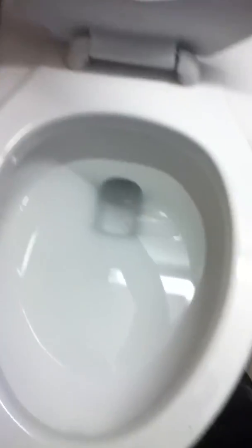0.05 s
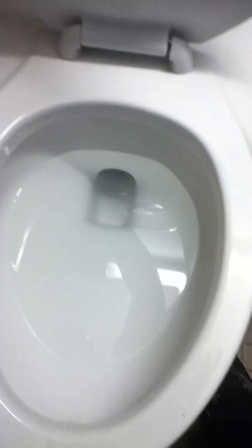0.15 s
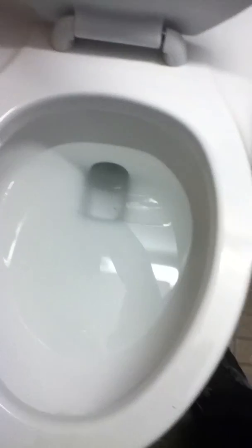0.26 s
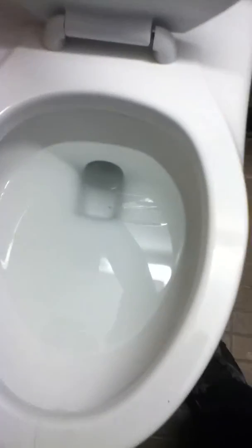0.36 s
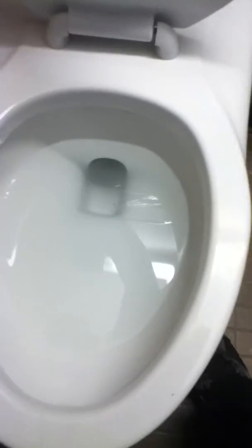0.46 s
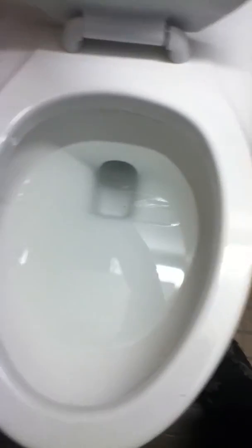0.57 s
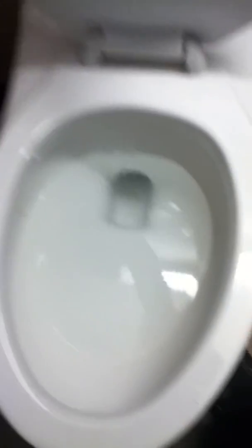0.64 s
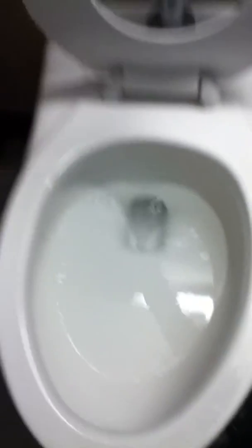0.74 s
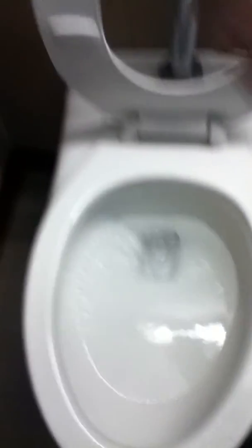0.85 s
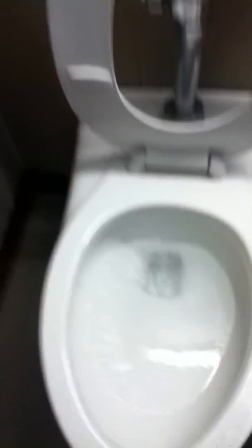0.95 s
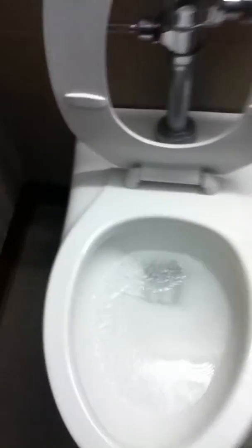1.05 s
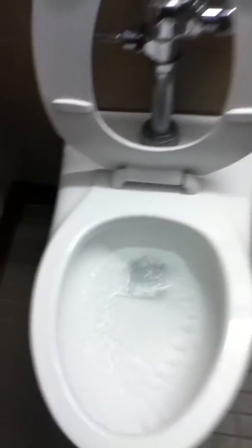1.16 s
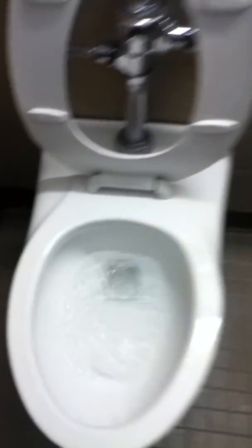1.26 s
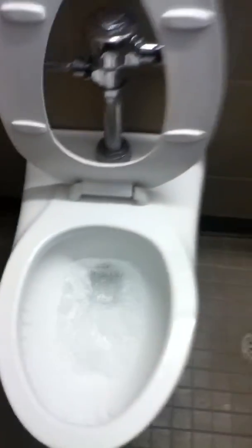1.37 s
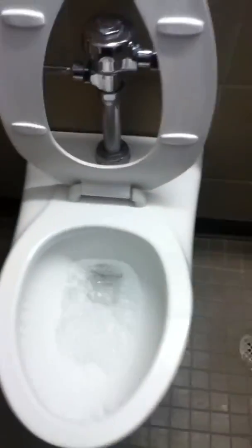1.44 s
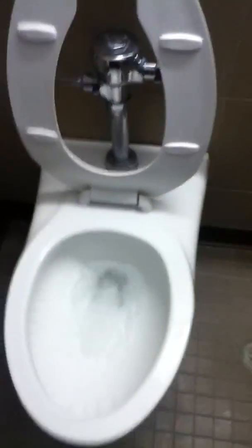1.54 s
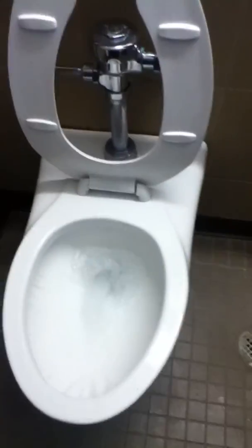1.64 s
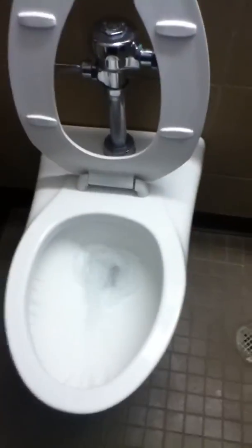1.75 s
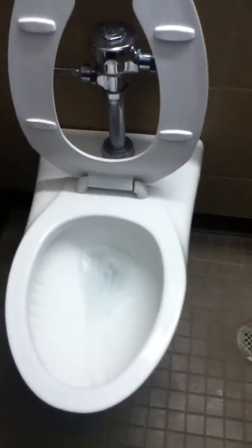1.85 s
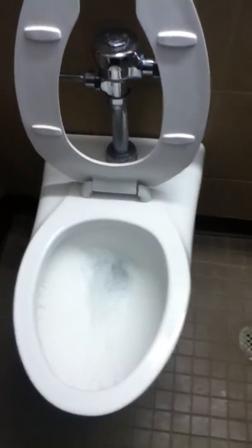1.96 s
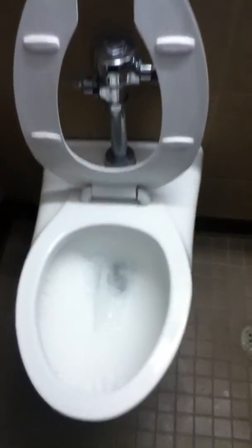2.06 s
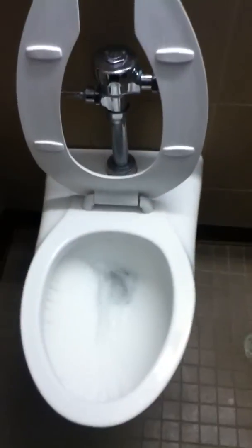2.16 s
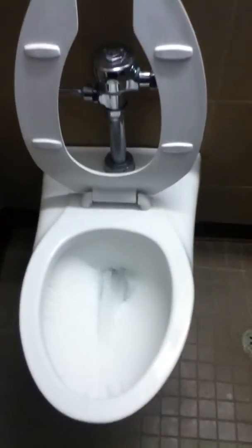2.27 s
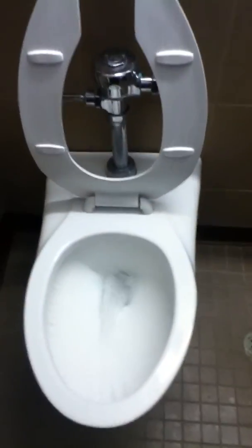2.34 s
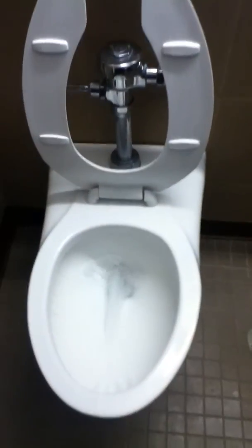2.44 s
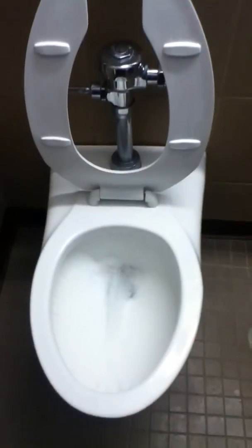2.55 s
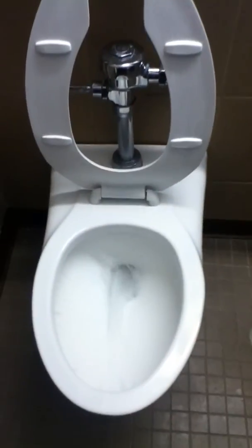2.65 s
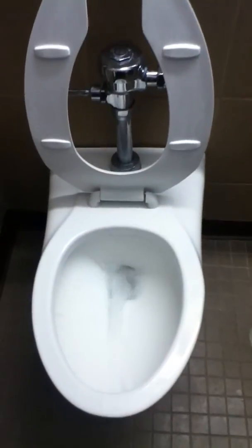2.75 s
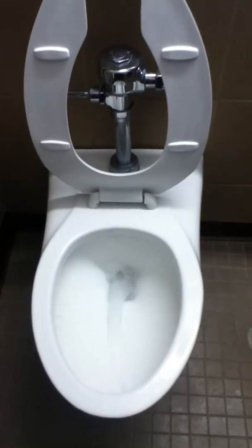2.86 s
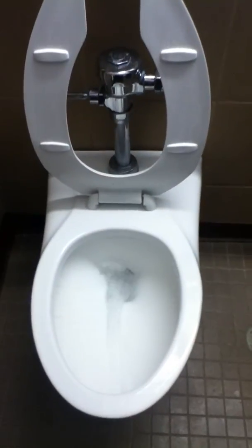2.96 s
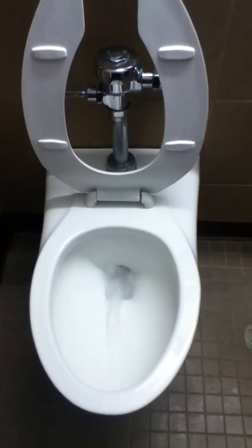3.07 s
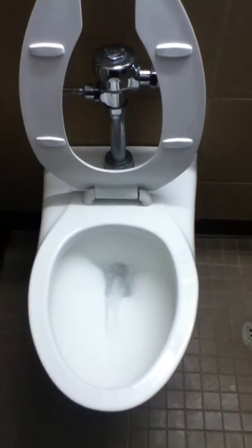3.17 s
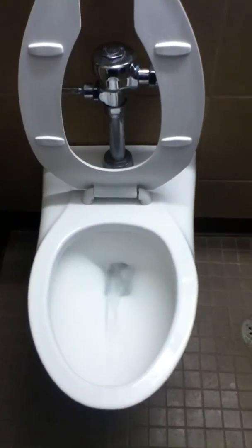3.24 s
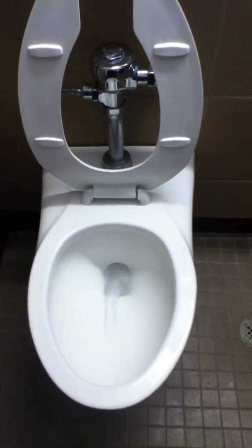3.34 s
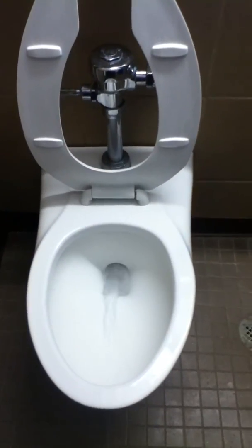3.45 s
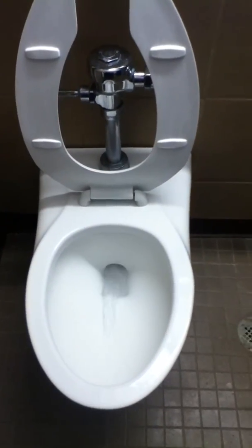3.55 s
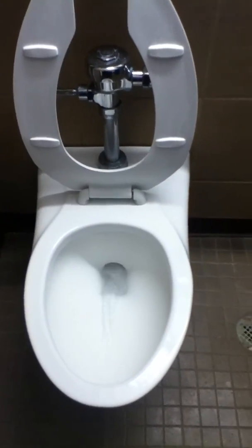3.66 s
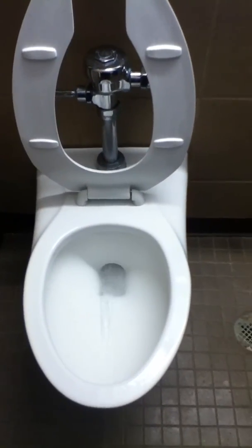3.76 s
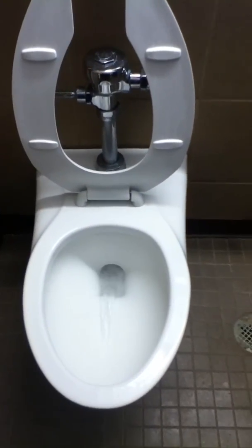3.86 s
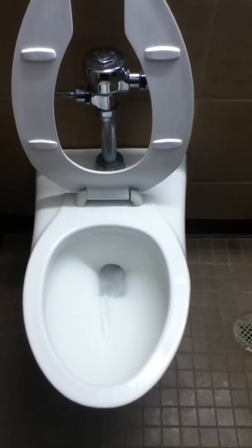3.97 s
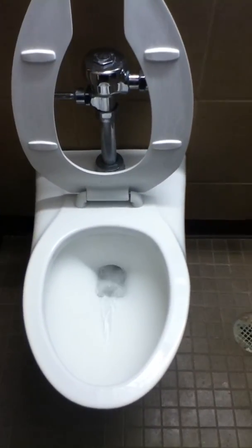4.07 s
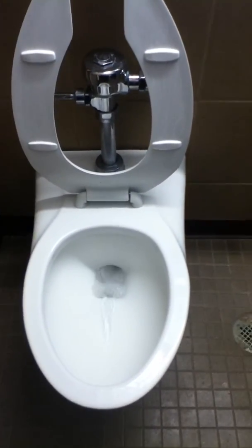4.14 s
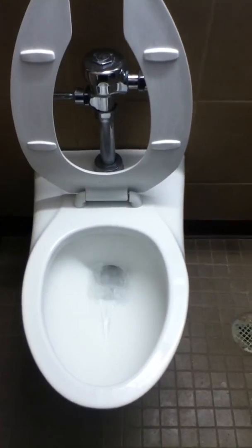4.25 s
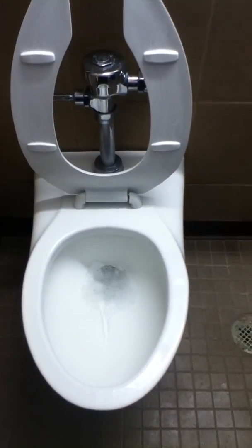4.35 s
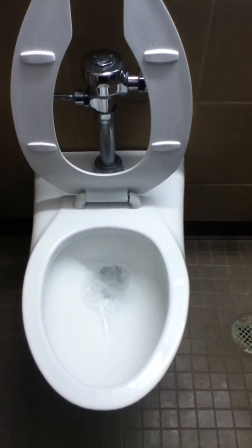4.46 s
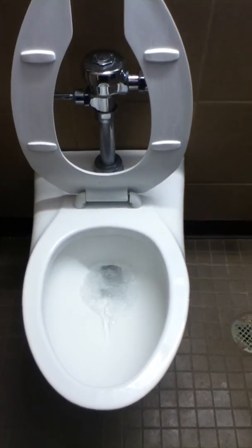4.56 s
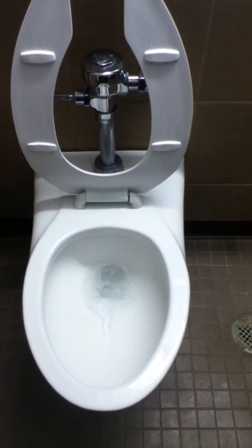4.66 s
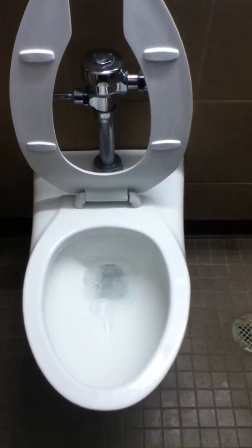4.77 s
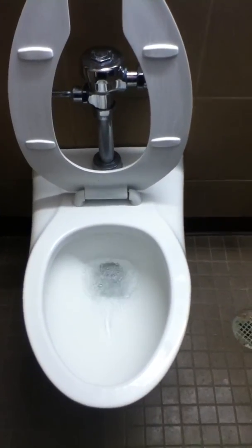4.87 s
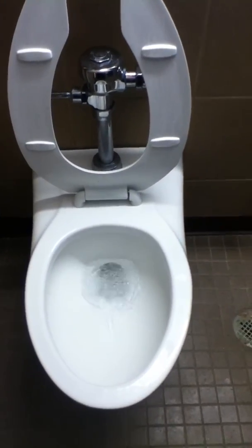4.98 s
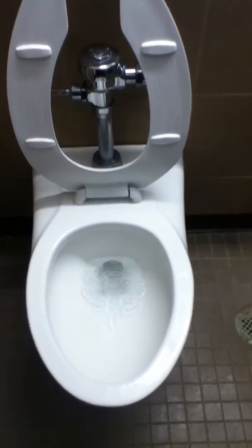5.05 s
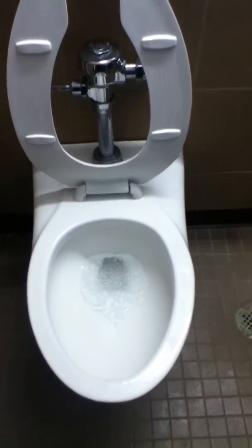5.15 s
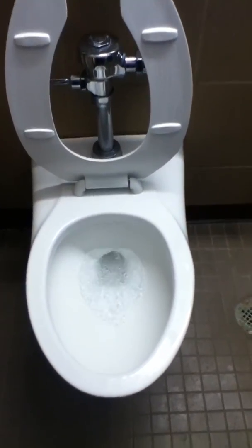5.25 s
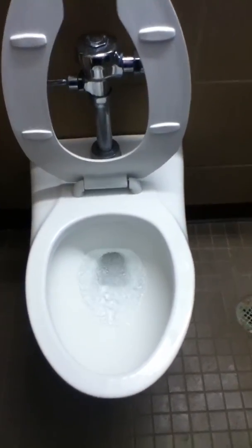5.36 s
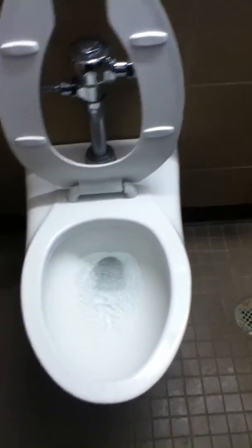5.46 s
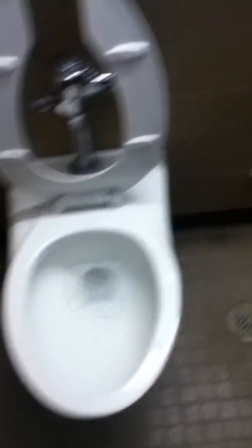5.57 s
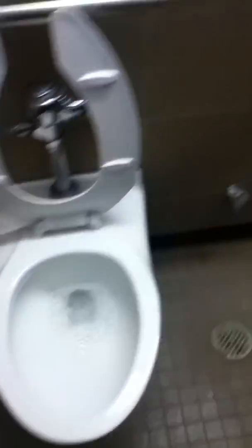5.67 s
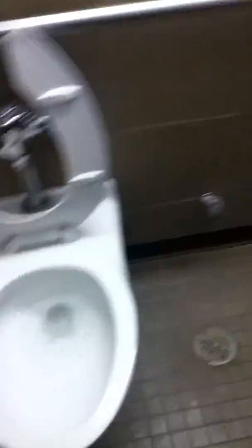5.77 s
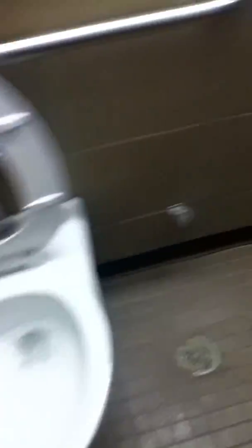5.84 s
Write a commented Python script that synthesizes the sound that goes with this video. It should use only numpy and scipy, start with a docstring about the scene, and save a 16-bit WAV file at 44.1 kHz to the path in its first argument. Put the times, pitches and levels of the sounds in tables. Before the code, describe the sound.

A toilet's flush valve snaps open, pipes thud and groan, then a loud hissing rush of water gurgles away over a low fan hum.

```python
"""Tiled restroom: a toilet with a flush valve is flushed under a humming fan.
The handle scrapes, the valve clicks open and hisses: filtered noise and ringing body modes.
Water drives air out of the pipe in thudding surges: random impacts on pipe and rim resonances.
Jets sizzle and spray the bowl; the siphon booms through the trap and breaks with a slurp of bubbles.
The pipe drones and a rinse stream sings in narrow bands of noise as the bowl refills."""
import sys
import numpy as np
from scipy import signal
from scipy.fft import rfft, irfft
from scipy.io import wavfile

SR = 44100
rng = np.random.default_rng(int(sys.argv[2]) if len(sys.argv) > 2 else 0)


def transcribe(u):
    """Save the signal u as a 16-bit wav file named by the first command-line argument.

    u: samples, shape (n,) or (channels, n), limited to [-1, 1]; the rate is SR.
    q: integer samples, one column per channel.
    """
    v = np.clip(np.atleast_2d(u).T, -1, 1)
    q = np.round(v * 32767).astype(np.int16)
    wavfile.write(sys.argv[1], SR, q)


N = 260631
TIME = np.arange(N) / SR
FREQS = np.fft.rfftfreq(N, 1 / SR)

ARRIVE_S, RIM_FULL_S = 0.546, 1.234  # first water down the pipe, rim channel full
EASE_S, BREAK_S = 3.32, 3.88  # flow eases, siphon breaks


def amp(db):
    """Decibels to gain."""
    return 10 ** (np.asarray(db) / 20)


def unit(x):
    """Scales to rms 1."""
    return x / np.sqrt(np.mean(x ** 2) + 1e-20)


def curve(rows, axis=1):
    """One column of a table, joined by straight lines in time."""
    rows = np.asarray(rows)
    return np.interp(TIME, rows[:, 0], rows[:, axis])


def level(rows, axis=1, fade_db=150):
    """Gain of a dB column; outside its span it dies by fade_db a second."""
    outside_s = np.maximum(rows[0][0] - TIME, 0) + np.maximum(TIME - rows[-1][0], 0)
    return amp(curve(rows, axis=axis) - fade_db * outside_s)


def stage(start, end, db, attack_s, fade_db_per_s, sag_db_per_s=0):
    """Gain: climbs 20 dB in attack_s up to start, sags from there on, fades after end."""
    early = np.maximum(start - TIME, 0)
    held = np.maximum(TIME - start, 0)
    late = np.maximum(TIME - end, 0)
    return amp(db - 20 * early / attack_s - sag_db_per_s * held - fade_db_per_s * late)


def pushes(rows, attack_s, fade_db_per_s, axis):
    """Gain of a run of pushes of water with one shape; axis picks the dB column."""
    gains = [stage(row[0], row[0] + row[1], row[axis], attack_s, fade_db_per_s) for row in rows]
    return np.sqrt(sum(gain ** 2 for gain in gains))


def wander(rate):
    """Slow chance of rms 1, up to about rate a second."""
    return unit(irfft(rfft(rng.standard_normal(N)) * (FREQS > 2) / (1 + (FREQS / rate) ** 2), N))


def read(points, hz):
    """A spectrum table on a log-frequency axis."""
    f, value = np.transpose(points)
    return np.interp(np.log(hz + 1), np.log(f + 1), value)


def colour(x, points, size=4096):
    """Causal minimum-phase filter, so that every drop keeps its sharp front; rms 1."""
    log_gain = np.log(amp(read(points, abs(np.fft.fftfreq(size, 1 / SR)))))
    taps = np.fft.ifft(np.exp(np.conj(signal.hilbert(log_gain)))).real
    return unit(signal.oaconvolve(x, taps[:size // 2])[:N])


def resonate(x, hz, width):
    """A steep resonance, fixed or following a curve; rms 1."""
    turn = np.exp(2j * np.pi * np.cumsum(hz * np.ones(len(x))) / SR)
    r = np.exp(-np.pi * width * np.sqrt(2) / SR)
    lowpassed = signal.lfilter([1], [1, -2 * r, r * r], x / turn + 1e-18)
    return unit((turn * lowpassed).real)


def ring(x, modes, bend=1):
    """A bank of resonances; bend shifts them all together."""
    return unit(sum(amp(db) * resonate(x, hz * bend, width) for hz, width, db in modes))


def sustain(x, smooth_hz, share):
    """A steady flow feeds a resonance and limits it, which evens out its swells."""
    power = irfft(rfft(x ** 2) * np.exp(-(FREQS / smooth_hz) ** 2), N)
    return unit(x / (abs(power) + .01) ** (np.clip(share, 0, 1) / 2))


def drops(per_s, spread_db, wash):
    """Impacts of many sizes over a wash of countless tiny ones."""
    size = amp(spread_db * np.minimum(rng.exponential(1, N), 4.5))
    hits = size * rng.choice([-1, 1], N) * (rng.random(N) < per_s / SR)
    return unit(unit(hits) + wash * rng.standard_normal(N))


def add(mix, s, sound):
    """Mixes a sound in at time s."""
    part = mix[round(s * SR):][:len(sound)]
    part += sound[:len(part)]


def bubbles(low_hz, high_hz, per_s, cycles, glide, count=24):
    """Bubbles of many pitches ring briefly, each rising as it nears the surface."""
    out, t = np.zeros(N), np.arange(SR // 20) / SR
    strength = rng.uniform(0.77, 1, N) * (rng.random(N) < per_s / SR)
    kind = rng.integers(0, count, N)
    for k, hz in enumerate(np.geomspace(low_hz, high_hz, count)):
        age = hz * t / cycles
        pop = np.sin(2 * np.pi * hz * t * (1 + glide * age)) * np.exp(-age) * (1 - np.exp(-hz * t))
        for at in np.flatnonzero(strength * (kind == k)):
            add(out, at / SR, strength[at] * pop)
    return unit(out)


# Spectrum of the fan's moving air: freq_hz, gain_db
FAN_SPECTRUM = [(30, -26), (65, -17.5), (110, -20), (150, -5.5), (195, -15.5), (245, -4), (290, -24.5),
                (690, -20.5), (785, -10.5), (890, -25.5), (1080, -16.5), (1250, -29), (1750, -37),
                (15000, -47.5)]
FAN_DB, HUM_HZ, HUM_DB = -46.5, 189.3, -46.5


def fan():
    """Steady moving air as coloured noise, and one blade tone with slight phase drift."""
    hum = np.sqrt(2) * np.sin(2 * np.pi * HUM_HZ * TIME + 0.066 * wander(rate=3))
    return amp(FAN_DB) * colour(rng.standard_normal(N), FAN_SPECTRUM) + amp(HUM_DB) * hum


# Handle pushed, its stem rubbing in the seal: time_s, level_db
HANDLE_LEVEL = [(.295, -73), (.325, -51), (.35, -57), (.4, -58), (.47, -58), (.5, -70)]
# Stem resonances: freq_hz, width_hz, gain_db
STEM_MODES = [(2000, 370, 0), (3800, 340, -3), (4270, 400, -1), (5270, 420, -2)]


def handle():
    """Faint gritty scrape: grains excite the stem before the valve trips."""
    return level(HANDLE_LEVEL) * ring(drops(per_s=700, spread_db=1, wash=0.67), STEM_MODES)


# Valve flow noise, before the hiss and tone trims: time_s, relative_db
VALVE_LEVEL = [(.3, -70), (.47, -48), (.5, -31.5), (1.2, -39), (3.5, -25.5), (4.1, -29), (4.7, -31.5),
               (5.6, -32.5), (5.9, -34.5)]
# Spectrum of the hiss: freq_hz, gain_db
VALVE_SPECTRUM = [(150, -53), (300, -0.5), (450, -8), (570, -1), (680, -9.5), (1250, -5), (1950, -10.5),
                  (2600, -1.5), (3500, -5.5), (4200, -2), (6900, -1), (7700, -6.5), (9000, -5.5),
                  (15500, -18.5)]
# Ringing in the valve: freq_hz, width_hz, gain_db
VALVE_MODES = [(565, 29, -16), (4260, 440, 0.5), (4965, 260, -1.5), (5745, 490, 1.5)]
DRONE_HZ, DRONE_WIDTH_HZ = 370.5, 39


def valve():
    """Hiss of the valve and of the thin rinsing film; the pipe drones unevenly as the flow eases."""
    hiss = colour(drops(per_s=2500, spread_db=2.5, wash=3.4), VALVE_SPECTRUM)
    tones = ring(rng.standard_normal(N), VALVE_MODES) * amp(wander(rate=13))
    drone = sustain(resonate(rng.standard_normal(N), DRONE_HZ, DRONE_WIDTH_HZ), smooth_hz=8.4, share=0.94)
    drone *= stage(EASE_S, 5.0, db=-39, attack_s=2.65, fade_db_per_s=4, sag_db_per_s=4)
    drone *= amp(2.8 * wander(rate=6.2))
    return level(VALVE_LEVEL) * (amp(-1.5) * hiss + amp(-5.5) * tones) + drone


# Valve clicks, before the crack and body gains: start_s, relative_db, crack_t60_s, treble_tilt_db
CLICK_HITS = [(0.415, -24, 0.053, 19), (0.4847, -5, 0.022, 5)]
# Modes of the valve body: freq_hz, gain_db, t60_s
BODY_MODES = [(1100, -4, .06), (2010, -5, 0.081), (2410, -8, 0.1), (3580, 4, 0.033), (3980, 8, 0.026),
              (4500, 5, 0.027), (5830, -9, 0.072), (6700, -17, .06)]


def clicks():
    """The handle tips the stem, then the valve snaps open: noise crack plus decaying body modes."""
    out, t = np.zeros(N), np.arange(SR // 4) / SR
    for s, db, t60, tilt_db in CLICK_HITS:
        spectrum = [(600, -10), (1500, -tilt_db), (4000, 14.0), (8000, tilt_db), (16000, 2 * tilt_db - 24)]
        crack = colour(rng.standard_normal(N), spectrum)[:len(t)] * amp(-60 * t / t60)
        body = sum(amp(mode_db - 60 * t / decay_s) * np.sin(2 * np.pi * (hz * t + rng.random()))
                   for hz, mode_db, decay_s in BODY_MODES)
        add(out, s, amp(db) * (0.43 * crack + 0.12 * body) * (1 - np.exp(-t / 0.00048)))
    return out


VALVE_JET_HZ, RIM_JET_HZ = 9400, 8150


def jets():
    """Thin fast jets sizzle in the opening valve, then at the rim holes, weakening as pressure sags."""
    drive = drops(per_s=2000, spread_db=2.0, wash=0.31) * amp(2 * wander(rate=26))
    leak = stage(.425, 0.4, db=-54, attack_s=.008, fade_db_per_s=120)
    opening = leak + stage(ARRIVE_S, ARRIVE_S, db=-38, attack_s=.04, fade_db_per_s=22)
    rim = stage(RIM_FULL_S, 2.95, db=-21.5, attack_s=0.13, fade_db_per_s=24, sag_db_per_s=2.5)
    return opening * resonate(drive, VALVE_JET_HZ, width=1900) + rim * resonate(drive, RIM_JET_HZ, width=1330)


# Surges driving air out of the pipe: start_s, hold_s, groan_db, rumble_db, rim_ring_db
SURGE_PUSHES = [(.49, 0.018, -36.5, -32, -39.5), (.565, 0.13, -14, -21, -32.5), (.69, 0.032, -12, -30, -24),
                (.772, 0.0079, -16.5, -34, -25), (.845, 0.089, -23, -46, -27)]
SURGE_ATTACK_S, SURGE_FADE_DB_PER_S = 0.046, 480
# Rumble spectrum: freq_hz, gain_db
RUMBLE_SPECTRUM = [(30, -31), (65, -12), (130, 7.5), (230, -7.5), (300, -4), (420, 9.5), (500, -10),
                   (720, -2), (900, -7), (1120, -27), (1250, -27), (2000, -20), (2500, -16.5),
                   (5000, -23.5), (12000, -34)]
# Air columns in the pipe: freq_hz, width_hz, gain_db
PIPE_MODES = [(129.6, 6.1, -19.5), (207.3, 8.4, -7.5), (236, 12, -1.5), (346, 11.3, 0.5), (386.4, 23.4, 5),
              (578, 52, 0), (722, 27, -20), (844, 33, -8.5), (1062, 63, -12)]
# Rim channel: freq_hz, width_hz, gain_db
RIM_MODES = [(1013, 23, 14), (1277, 26, -1), (1370, 14, 3), (1674, 20, 6.5), (1730, 28, -13), (2322, 60, 8),
             (2430, 32, 7), (2610, 54, -1), (2830, 35, 6), (3234, 76, 8.5), (3940, 68, -6)]
# Slugs of water thudding in the pipe, before the soft attack: start_s, level_db
SLUG_HITS = [(0.485, -11.5), (0.554, -21), (.571, -13.5), (.595, -2), (0.636, -27), (0.672, -9),
             (0.713, -7)]


def surge():
    """Trapped air and water slugs pound the pipe; air rings the rim modes until the last of it leaves."""
    sloshing = 1 + 0.014 * wander(rate=16)  # moving water changes the length of the air columns
    groan = ring(drops(per_s=780, spread_db=4.5, wash=0.83), PIPE_MODES, sloshing)
    groan = sustain(groan, smooth_hz=30, share=0.57)
    rumble = colour(drops(per_s=270, spread_db=3.0, wash=0.77), RUMBLE_SPECTRUM)
    # bursting bubbles excite now one mode of the rim, now another
    bursts = drops(per_s=250, spread_db=-1.5, wash=0.8)
    bursts += .5 * bubbles(980, 4090, per_s=220, cycles=7.9, glide=0.026)
    last_air = stage(0.74, 1.0, db=-26, attack_s=.2, fade_db_per_s=41)
    rim_air = stage(1.3, 1.8, db=-36, attack_s=0.57, fade_db_per_s=100)
    groan_push, rumble_push, rim_push = [
        pushes(SURGE_PUSHES, SURGE_ATTACK_S, SURGE_FADE_DB_PER_S, axis=axis) for axis in (2, 3, 4)]
    out = groan * np.hypot(groan_push, last_air)
    out += rumble * np.hypot(rumble_push, amp(-15.5) * last_air)
    out += ring(bursts, RIM_MODES, sloshing) * np.hypot(rim_push, rim_air)
    out *= stage(0.477, N / SR, db=0, attack_s=.02, fade_db_per_s=0)  # held back until the valve opens
    t = np.arange(SR // 4) / SR
    for s, db in SLUG_HITS:
        thud = sum(amp(mode_db) * np.exp(-np.pi * width * t) * np.sin(2 * np.pi * (hz * t + rng.random()))
                   for hz, width, mode_db in PIPE_MODES)
        add(out, s, amp(db) * thud / abs(thud).max() * (1 - np.exp(-t / 0.0026)))
    return out


# Spits of water and air: start_s, peak_db, centre_hz, width_hz, t60_s
SPIT_BURSTS = [(0.714, -14, 2830, 2500, 0.025), (1.11, -16, 2300, 1200, 0.077),
               (1.128, -16, 3480, 3000, 0.062), (1.237, -6, 7150, 2200, 0.074),
               (1.298, -3, 7400, 2000, 0.067), (1.92, -17.5, 2080, 247, 0.25),
               (2.058, -7.5, 7900, 1300, .11), (2.271, -12, 6840, 1100, .035),
               (3.155, -16, 9600, 2500, 0.036), (3.909, -13, 2100, 900, 0.057),
               (3.939, -22, 2200, 600, 0.12), (4.195, -27, 4500, 2500, .04)]


def spits():
    """Pockets of air burst through the water as short bands of noise."""
    out, t = np.zeros(N), np.arange(SR // 4) / SR
    for s, db, hz, width, t60 in SPIT_BURSTS:
        fizz = signal.lfilter([1, 0, -1], [1], rng.standard_normal(len(t)))  # small bursts push no bass
        burst = resonate(fizz, hz, width) * amp(-60 * t / t60) * (1 - np.exp(-t / 0.0025))
        add(out, s, amp(db) * burst / abs(burst).max())
    return out


# Swarms of big bubbles: start_s, length_s, level_db, lowest_hz, highest_hz
BUBBLE_SWARMS = [(0.768, 0.049, -26.5, 1310, 1920), (0.815, 0.095, -23, 930, 1140),
                 (0.818, .12, -28.5, 1300, 1800), (2.397, 0.57, -33, 708, 1100),
                 (3.556, 0.2, -32, 1208, 1880), (3.86, 0.15, -30, 1420, 2430),
                 (3.973, 0.15, -39, 1200, 2150), (5.303, 0.3, -45.5, 2520, 2640)]


def gulps():
    """Air dragged through water as the jet starts, the siphon breaks and the pool refills."""
    out = np.zeros(N)
    for s, length, db, low_hz, high_hz in BUBBLE_SWARMS:
        swell = np.sqrt(np.maximum(0, 1 - (2 * (TIME - s) / length - 1) ** 2))
        out += amp(db) * swell * bubbles(low_hz, high_hz, per_s=500, cycles=10.1, glide=0.012, count=10)
    return out


# Air pocket in the drain throat, before a trim: time_s, relative_db, resonance_hz
THROAT_POCKET = [(.88, -27.5, 343), (1.05, -23.5, 310), (1.32, -26.5, 323), (1.55, -29.5, 307),
                 (1.8, -31, 314), (2.5, -29, 333), (2.8, -33.5, 338), (3.0, -27.5, 395), (3.25, -33, 356),
                 (3.75, -30.5, 287), (4.0, -41.5, 330), (4.3, -41.5, 345)]
# Hollows of the bowl: freq_hz, width_hz, gain_db
BOWL_MODES = [(626, 53, -2), (727.4, 39, 5), (910, 100, 1.5), (1058, 27, 3.5)]
# Spectrum of the churning water: freq_hz, gain_db
CHURN_SPECTRUM = [(100, -54), (300, -29.5), (480, 6.5), (800, -3), (1200, -0.5), (1600, -27), (3000, -47)]
# Gurgling, before the gurgle mix: time_s, relative_db
GURGLE_LEVEL = [(.8, -30), (1.35, -23.5), (1.85, -30.5), (2.55, -23), (2.85, -24.5), (3.9, -33.5),
                (4.4, -48)]
# Gushes into the bowl, also played by spray(): start_s, hold_s, gurgle_db, splash_db, spray_db
GUSH_PUSHES = [(.845, .11, -20.5, -35.5, -29.5), (1.11, 0.028, -33, -27.5, -26.5),
               (1.45, .08, -33, -27.5, -37), (3.06, .1, -29.5, -29, -26)]
GUSH_ATTACK_S, GUSH_FADE_DB_PER_S = 0.094, 200


def siphon():
    """The throat's air pocket booms through two trap modes; bubbles gurgle in the bowl's hollows."""
    boom = resonate(drops(per_s=500, spread_db=-0.5, wash=1.0), curve(THROAT_POCKET, axis=2), width=126)
    boom = colour(boom, [(120, -15.5), (195, -12.0), (240, -2), (272, 11), (302, 1.0),
                         (342, 6.5), (395, 1.0), (450, -1.5), (900, -17.0)])
    boom = sustain(boom, smooth_hz=11, share=0.12)
    hollow = ring(drops(per_s=400, spread_db=4.0, wash=1.0), BOWL_MODES)
    churn = colour(drops(per_s=600, spread_db=2.5, wash=0.75), CHURN_SPECTRUM)
    gurgle = amp(-6.0) * hollow + amp(-10.5) * churn
    gurgle += amp(-8.5) * bubbles(610.0, 1537, per_s=180, cycles=11.7, glide=0.014)
    gushing = pushes(GUSH_PUSHES, GUSH_ATTACK_S, GUSH_FADE_DB_PER_S, axis=2)
    gurgling = np.hypot(level(GURGLE_LEVEL, fade_db=25), gushing)
    gurgle *= gurgling * amp(0.23 * wander(rate=12))
    return amp(-1.0) * level(THROAT_POCKET, fade_db=47) * boom + gurgle


# Coarse drops: freq_hz, gain_db
SPLASH_SPECTRUM = [(200, -51), (700, -36), (1150, 1), (1350, -3), (1650, 3.5), (2300, 0), (3200, 5),
                   (4000, 3), (5200, -0.5), (9000, -22.5)]
# Ringing under the splash: freq_hz, width_hz, gain_db
SPLASH_MODES = [(1320, 40, -3.5), (1724, 260, -4), (2082, 35, 1), (2298, 230, 7.5), (2790, 54, -8),
                (3380, 180, -15), (3980, 380, -34)]
# Fine mist: freq_hz, gain_db
MIST_SPECTRUM = [(300, -58), (2500, -15.5), (4000, 2.5), (5000, 2), (6500, 8), (8500, 3), (9500, 0.5),
                 (10500, -1.5), (12500, -7), (15500, -20.5)]


def spray():
    """Sheets break into drops on porcelain: a trickle, then a pulsing rush once the rim fills."""
    pulsing = wander(rate=30)
    splash = amp(-1) * colour(drops(per_s=1600, spread_db=2.5, wash=0.78), SPLASH_SPECTRUM)
    splash += amp(-9.0) * ring(drops(per_s=410, spread_db=-0.5, wash=0.57), SPLASH_MODES)
    splash += amp(-7.5) * bubbles(1281, 4207, per_s=350, cycles=16.8, glide=0.0153)
    splash *= amp(0.83 * pulsing + wander(rate=14))
    mist = colour(drops(per_s=2400, spread_db=3.0, wash=0.99), MIST_SPECTRUM)
    mist += amp(-5) * bubbles(4220, 9330, per_s=360, cycles=28, glide=0.011)
    mist *= amp(1.04 * pulsing)
    trickle = stage(.83, 1.06, db=-29.5, attack_s=0.085, fade_db_per_s=37)
    draining = stage(RIM_FULL_S, BREAK_S, db=0, attack_s=0.059, fade_db_per_s=41)
    coarse = draining * stage(1.266, EASE_S, db=-21.5, attack_s=0.65, fade_db_per_s=4, sag_db_per_s=2.0)
    fine = draining * stage(1.3, EASE_S, db=-20.5, attack_s=1.0, fade_db_per_s=10, sag_db_per_s=3.5)
    splash_gush, mist_gush = [
        pushes(GUSH_PUSHES, GUSH_ATTACK_S, GUSH_FADE_DB_PER_S, axis=axis) for axis in (3, 4)]
    splash *= np.sqrt(coarse ** 2 + (amp(-3) * trickle) ** 2 + splash_gush ** 2)
    mist *= np.sqrt(fine ** 2 + trickle ** 2 + mist_gush ** 2)
    return splash + mist


# Single large bubbles, before the soft attack: start_s, level_db, start_pitch_hz, t60_s
PLOP_BUBBLES = [(1.072, -18.5, 2410, 0.061), (1.123, -17, 2410, 0.064), (1.916, -18, 2030, 0.093),
                (2.213, -20.5, 693, 0.17), (3.133, -15, 1610, 0.041), (3.631, -18.5, 1546, 0.093),
                (3.88, -11, 1703, 0.037), (3.909, -21, 1740, .05), (4.06, -25, 1770, 0.065),
                (4.087, -33, 1750, .05)]


def plops():
    """A large bubble pinches off and rings, its pitch rising a little."""
    out, t = np.zeros(N), np.arange(SR // 5) / SR
    for s, db, hz, t60 in PLOP_BUBBLES:
        tone = np.sin(2 * np.pi * hz * t * (1 + 0.014 * t / t60))
        add(out, s, amp(db - 60 * t / t60) * tone * (1 - np.exp(-t / 0.00065)))
    return out


# Rinse stream into the drain, later the rising pool: start_s, hold_s, level_db, attack_s, fade_db_per_s
RINSE_FLOWS = [(2.75, 0.19, -30.5, 0.81, 8.5), (5.0, .5, -41, 0.7, 58)]
RINSE_HZ = 2786


def refill():
    """The rinse stream sings in a narrow, slightly wavering band, with a weak lower partner."""
    drive = drops(per_s=1100, spread_db=1.0, wash=1)
    hz = RINSE_HZ * (1 + 0.0097 * wander(rate=6))
    hz = hz - 110 * stage(5.42, 5.48, db=1, attack_s=.16, fade_db_per_s=200)  # the pitch dips briefly
    gains = [stage(s, s + hold, db, attack_s, fade) for s, hold, db, attack_s, fade in RINSE_FLOWS]
    flow = np.sqrt(sum(gain ** 2 for gain in gains))
    return flow * (resonate(drive, hz, width=190) + amp(-10.5) * resonate(drive, 0.473 * hz, width=75))


# Tiled room decay: freq_hz, t60_s
ROOM_DECAY = [(125, 0.31), (500, 0.35), (2000, 0.99), (6000, 0.14), (14000, 0.23)]


def room(x):
    """Dense echoes off the tiles, each band dying at its own speed."""
    taps = rng.standard_normal(SR) * (rng.random(SR) < 3000 / SR)
    taps *= np.arange(SR) > SR // 250  # first echo after 4 ms
    hz, t, z = signal.stft(taps, SR, nperseg=256)
    tail = signal.istft(z * amp(-60 * t / read(ROOM_DECAY, hz)[:, None]), SR, nperseg=256)[1]
    return signal.fftconvolve(x, tail / np.linalg.norm(tail))[:N]


def scene():
    """Sums the sources and the room; the bowl churns only once water has come down the pipe."""
    arrived = stage(ARRIVE_S, N / SR, db=0, attack_s=.025, fade_db_per_s=0)
    plumbing = handle() + valve() + clicks() + surge()
    bowl = arrived * (siphon() + spray()) + jets() + gulps() + spits() + plops() + refill()
    mono = plumbing + bowl + amp(-11.5) * room(plumbing + bowl) + fan()
    return np.array([mono, mono])


EDGE_HZ = 15800


def record(dry):
    """One microphone that rounds off the loudest peaks; then the band limit."""
    ceiling = 0.97
    rounded = ceiling * np.tanh(dry / ceiling)
    lowpass = signal.firwin(511, EDGE_HZ, window=("kaiser", 9), fs=SR)
    return signal.oaconvolve(rounded, lowpass[None], "same")


dry = scene()
out = record(dry)
transcribe(out)
```